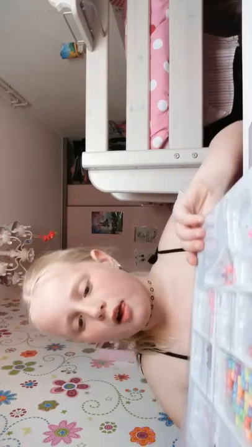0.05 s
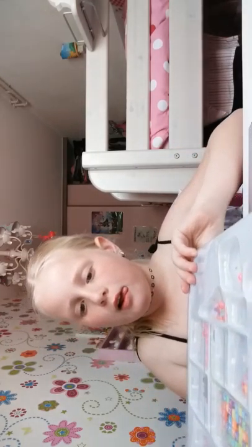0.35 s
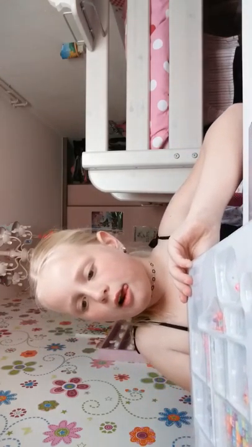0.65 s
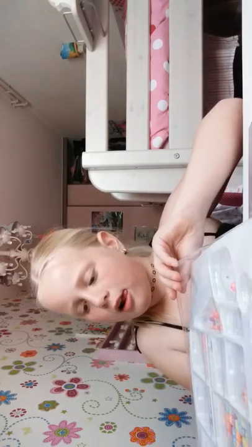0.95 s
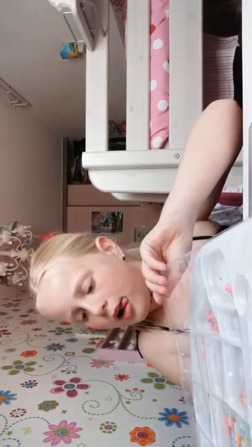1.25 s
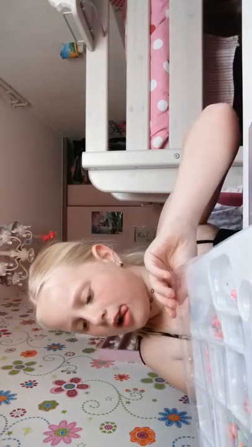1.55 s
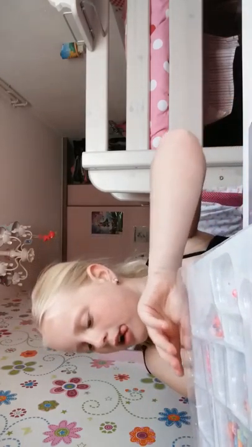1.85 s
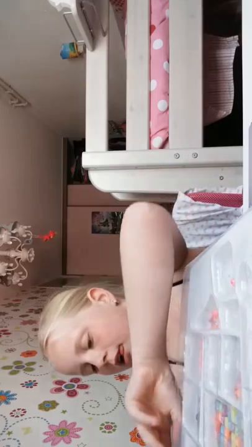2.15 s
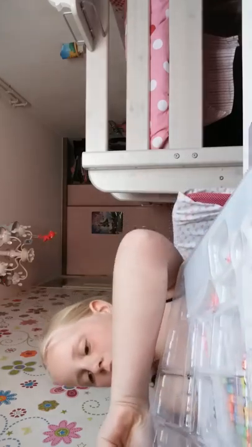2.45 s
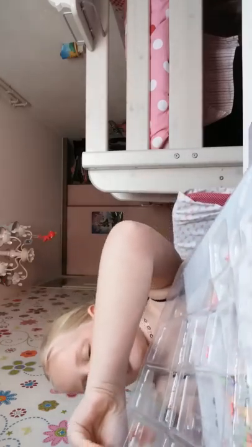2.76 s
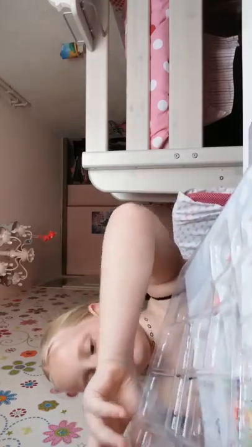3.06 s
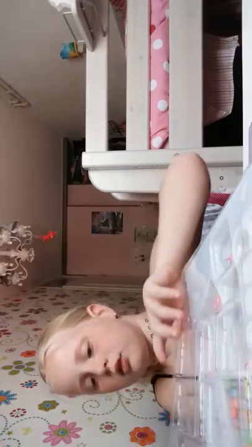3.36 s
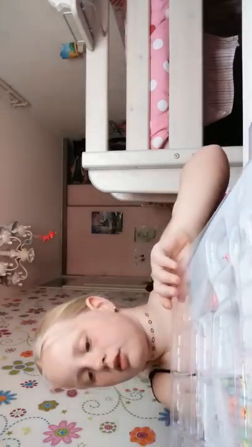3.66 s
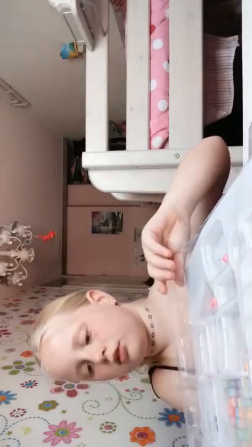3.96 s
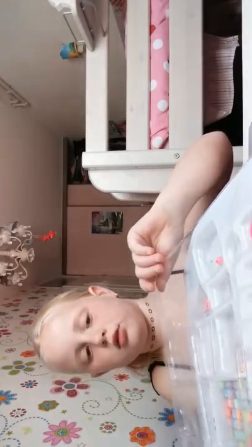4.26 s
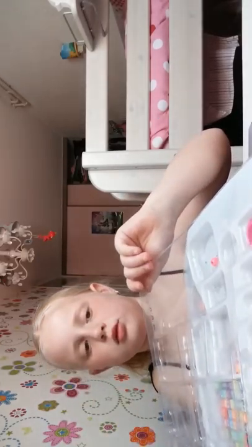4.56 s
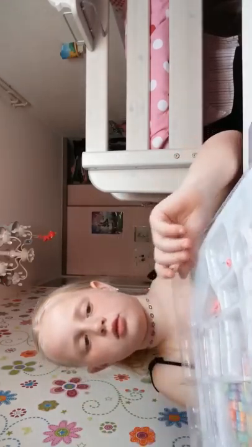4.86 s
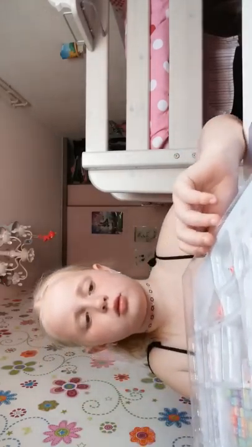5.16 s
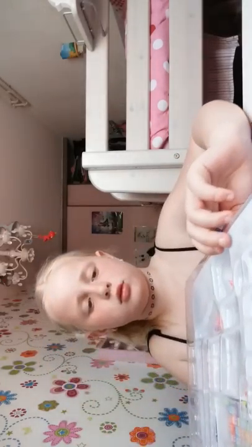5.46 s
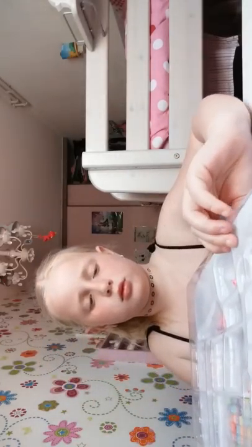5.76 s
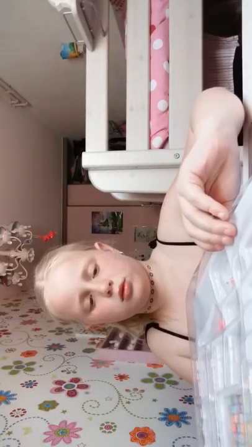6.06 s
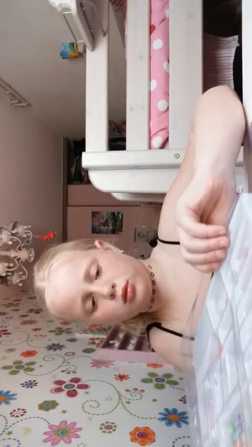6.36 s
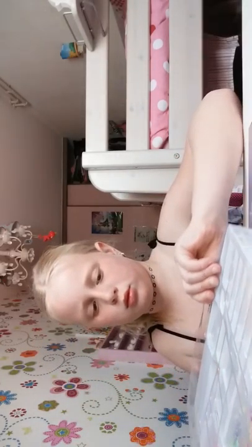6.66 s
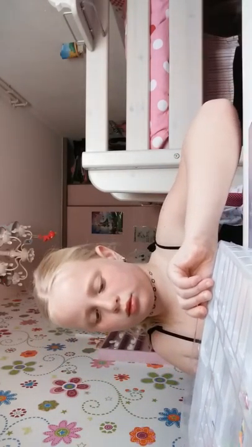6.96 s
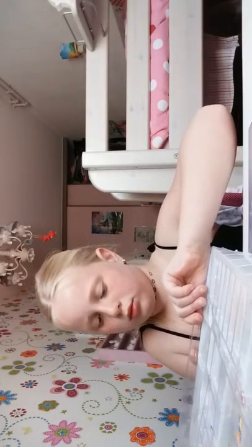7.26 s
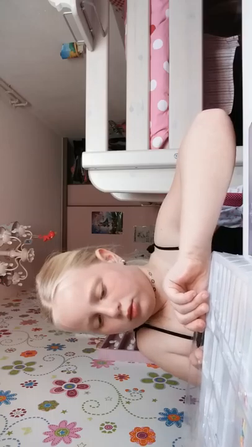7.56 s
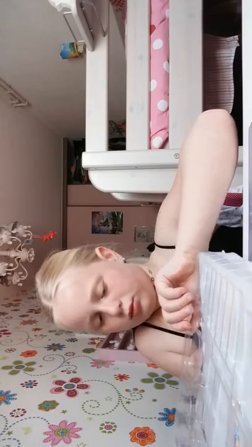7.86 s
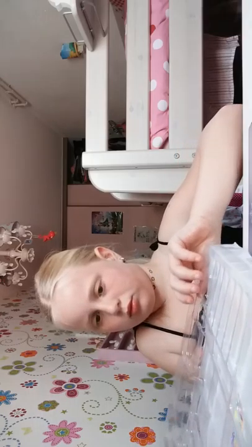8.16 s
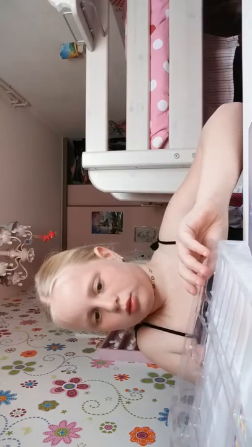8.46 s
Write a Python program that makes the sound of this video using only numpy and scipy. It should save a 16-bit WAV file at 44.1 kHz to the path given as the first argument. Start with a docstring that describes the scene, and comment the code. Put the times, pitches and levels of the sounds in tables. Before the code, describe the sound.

Close by in a small furnished room, a thin plastic box scrapes across a desk in uneven bursts while beads patter inside. Its latch snaps three times early on, among dull bumps. Fingers and lid then tap and knock more softly, before firmer sliding and brushing return with another sharp snap, a quick clatter with a thud, and a final shove.

```python
"""A clear plastic bead box is lifted, turned and tilted on a bedroom desk, close to the microphone.
First come short shoves: box and beads scrape, ringing the thin walls, skin brushes the plastic,
the latch cracks three times and the desk carries low thumps. From 2.7 s the handling is lighter,
with finger taps and knocks of lid and dividers. From 4.9 s the slides are harder; the latch cracks
again at 6.3 s, the box clatters and thumps near 7.4 s, and a last push ends at about 8.4 s."""
import sys
import numpy as np
from scipy import signal
from scipy.fft import rfft, irfft, next_fast_len
from scipy.io import wavfile
from scipy.ndimage import uniform_filter1d

SR = 44100
rng = np.random.default_rng(int(sys.argv[2]) if len(sys.argv) > 2 else 0)


def output_pcm(signal):
    """Save a mono or channel-first signal as 16-bit PCM at the path in sys.argv[1].

    Samples are clipped to [-1, 1] before scaling.
    """
    pcm = np.clip(np.atleast_2d(signal).T, -1, 1) * 32767
    wavfile.write(sys.argv[1], SR, np.round(pcm).astype(np.int16))


N = 375732
TIME_S = np.arange(N) / SR
HZ = np.fft.rfftfreq(4096, 1 / SR)


def amp(db):
    """dB to gain."""
    return 10 ** (np.asarray(db) / 20)


def unit(x):
    """Scale to unit rms."""
    return x / np.sqrt(np.mean(x ** 2) + 1e-20)


def over_freq(points, hz=HZ):
    """Interpolate a table over log frequency."""
    f, value = np.transpose(points)
    return np.interp(np.log(hz + 1), np.log(f), value)


def over_time(points, t=TIME_S):
    """Interpolate a table over time."""
    return np.interp(t, *np.transpose(points))


def bell(hz, width_oct):
    """Unit-height bell over log frequency."""
    return np.exp(-(np.log2((HZ + 1) / hz) / width_oct) ** 2)


def resonances_db(modes):
    """Sum of resonant peaks and dips over frequency."""
    return sum(db / (1 + (2 * (HZ - hz) / width_hz) ** 2) for hz, width_hz, db in modes)


def add(mix, s, sound):
    """Mix a stereo sound in at time s."""
    part = mix[:, max(round(s * SR), 0):][:, :sound.shape[1]]
    part += sound[:, :part.shape[1]]


def pan(lean_db):
    """Channel gains for a left-minus-right level."""
    return amp(np.vstack([lean_db, -lean_db]) / 2)


def colour(x, gain_db):
    """Minimum-phase filter: rings after a blow, never before."""
    log_gain = np.log(amp(np.r_[gain_db, gain_db[-2:0:-1]]))
    impulse = np.fft.ifft(np.exp(np.conj(signal.hilbert(log_gain)))).real
    return signal.oaconvolve(x, impulse[None, :len(HZ)], axes=1)


def flatten(burst, width_hz=650):
    """Level the broad spectrum; narrow peaks and dips stay."""
    power = uniform_filter1d(abs(rfft(burst[:2 * len(HZ) - 2])) ** 2, int(width_hz / HZ[1]))
    return colour(burst[None], -10 * np.log10(abs(power) + 1e-9))[0, :len(burst)]


def wobble(per_s):
    """Smooth random motion of about unit size."""
    steps = rng.standard_normal(N // 20)
    return np.interp(TIME_S * per_s, np.arange(len(steps)), steps)


def grains(per_s, spread_db):
    """Tiny impacts, random in time and size."""
    size = amp(spread_db * np.minimum(rng.exponential(1, N), 4))
    return unit(rng.standard_normal((2, N)) * size * (rng.random(N) < per_s / SR))


# left-right likeness: f/Hz, correlation
CORRELATION = [(60, 0.95), (600, 0.85), (1200, 0.59), (2200, 0.25), (4000, 0.033), (15000, 0.029)]
def mic_pair(x):
    """Two unrelated signals to stereo: alike in the bass, apart in the treble."""
    size = next_fast_len(x.shape[1])
    mid, side = rfft(x, size)
    same = over_freq(CORRELATION, np.fft.rfftfreq(size, 1 / SR))
    mid, side = mid * np.sqrt(1 + same), side * np.sqrt(1 - same)
    return irfft(np.array([mid + side, mid - side]), size)[:, :x.shape[1]]


def texture(drive, gain_db):
    """Coloured stereo layer at unit rms."""
    return unit(mic_pair(colour(drive, gain_db))[:, :N])


# room noise: f/Hz, level/dB
AMBIENCE_SPECTRUM = [(20, 4), (110, 13), (300, 7), (600, 16), (1100, -33.5), (2000, -44), (5000, -48.5),
                     (15000, -24)]
def ambience(level_db=-67):
    """Faint steady room noise."""
    return amp(level_db) * texture(rng.standard_normal((2, N)), over_freq(AMBIENCE_SPECTRUM))


# reverberation: f/Hz, t60/s
ROOM_DECAY = [(100, 0.48), (600, 0.18), (2500, 0.2), (6000, 0.2), (15000, 0.21)]
def room(x, build_s=0.0049):
    """Small furnished room: dense reflections, bass lasting longest."""
    hz, t, noise = signal.stft(rng.standard_normal((2, SR // 2)), SR, nperseg=256)
    decay = amp(-60 * t / over_freq(ROOM_DECAY, hz)[:, None])
    tail = mic_pair(signal.istft(noise * decay, SR, nperseg=256)[1])
    tail *= 1 - np.exp(-(np.arange(tail.shape[1]) / SR / build_s) ** 2)
    return signal.fftconvolve(x, tail / np.linalg.norm(tail[0]), axes=1)[:, :N]


# firmness of the shifting hands: t/s, level/dB
GRIP_DB = [(0, 15), (0.43, 3), (0.54, -5.5), (0.62, 1.5), (0.88, -8), (1.1, -0.5), (1.24, -22), (1.36, -23),
           (1.55, 5), (1.92, 5), (2.35, -4), (2.69, -2), (2.77, 1.5), (2.93, -3), (3.25, 2.5), (3.48, -7),
           (3.7, -2), (3.9, -6.5), (4.2, 1), (4.35, -19), (4.47, -1), (4.72, 9), (4.86, 3.5), (5.3, 7),
           (5.5, -2.5), (5.68, 5), (6.86, 5), (7.0, 8.5), (7.13, 6.5), (7.4, -1.5), (7.8, 9), (8.52, 4)]
# shoves of the box: t/s, rise/s, hold/s, scrape level/dB, brush level/dB, bump level/dB
SHOVES = [(-0.04, 0.11, 0.065, -35, -41, -74.5), (0.215, 0.055, 0.046, -42.5, -43, -47),
          (0.655, .01, 0.17, -57, -78, -61.5), (0.901, 0.0073, 0.016, -28, -35, -43),
          (0.94, 0.0084, 0.042, -36.5, -41.5, -48), (1.261, 0.058, 0.056, -48, -56.5, -53.5),
          (1.382, 0.054, 0.18, -74, -59.5, -66), (1.62, 0.034, 0.26, -53.5, -53.5, -78),
          (1.962, 0.057, 0.12, -33, -43.5, -47.5), (2.124, 0.024, 0.095, -38, -46, -48.5),
          (2.42, 0.096, 0.041, -40.5, -44.5, -50), (2.75, 0.16, 0.2, -68, -54.5, -75),
          (3.018, 0.029, 0.15, -47.5, -71, -59), (3.268, 0.041, 0.068, -58, -59.5, -55),
          (3.608, 0.037, 0.1, -52, -58.5, -54), (4.052, 0.003, 0.037, -49, -48, -68),
          (4.367, 0.087, 0.11, -48, -63, -57), (4.9, 0.094, 0.13, -31.5, -51.5, -48),
          (5.132, 0.016, 0.11, -44.5, -65, -59), (5.539, 0.037, 0.23, -43, -57, -51.5),
          (5.914, 0.16, 0.13, -32, -43.5, -50), (6.219, 0.022, 0.095, -37, -47, -50),
          (6.356, 0.045, 0.039, -33, -38.5, -62), (6.452, 0.024, 0.13, -36, -45, -64),
          (6.625, 0.024, 0.082, -35, -47, -42.5), (6.914, 0.016, 0.09, -57, -63, -47.5),
          (7.17, 0.031, 0.03, -50.5, -51.5, -46.5), (7.429, 0.0062, 0.054, -30.5, -34.5, -42.5),
          (7.555, 0.04, 0.032, -38, -42, -45.5), (7.618, 0.03, 0.039, -35.5, -44, -54),
          (7.965, 0.081, 0.036, -36, -45, -45), (8.197, 0.1, 0.078, -38.5, -45, -44)]
def effort(layer, grip_db, start_db=-15.5, release_db_per_s=196):
    """Gain of a rubbing layer: shifting grip plus shoves that speed up, hold and die."""
    column = ("scrape", "brush", "bump").index(layer)
    t = np.arange(0, N / SR, 0.001)
    power = amp(grip_db + over_time(GRIP_DB, t)) ** 2
    for s, rise_s, hold_s, *levels_db in SHOVES:
        rise_db = start_db * np.maximum(1 - (t - s) / rise_s, 0)
        fall_db = release_db_per_s * np.maximum(t - s - rise_s - hold_s, 0)
        power += amp(levels_db[column] + rise_db - fall_db) ** 2
    return np.interp(TIME_S, t, np.sqrt(power))


# desk rumble: f/Hz, level/dB
BUMP_SPECTRUM = [(28, -42), (50, -14), (75, -5), (110, 0), (152, 2), (200, -2.5), (250, 1), (310, -2),
                 (400, -6), (900, -16), (5000, -38.5), (14000, -51)]
def bumping(trim_db=-3.5, uneven_db=-2.1):
    """Soft pushes of box and arms, carried through the desk."""
    pushes = grains(per_s=390, spread_db=-9) * amp(uneven_db * wobble(per_s=30))
    rumble = texture(pushes, over_freq(BUMP_SPECTRUM))
    return rumble * effort("bump", grip_db=-63) * amp(trim_db) * pan(lean_db=0.5)


# box set down or pushed on the desk: t/s, level/dB, f/Hz, swell/s
DESK_THUMPS = [(0.908, -31.5, 94, 0.0054), (2.014, -38.5, 116, 0.0066), (2.106, -39, 126, 0.0055),
               (2.203, -38, 156, 0.0038), (2.488, -40.5, 115, 0.0044), (7.428, -32.5, 153, 0.01),
               (8.269, -41, 150.3, 0.033), (8.345, -40.5, 190, 0.024)]
def thumps():
    """The desk top swings briefly under each push."""
    out, t = np.zeros((2, N)), np.arange(SR // 5) / SR
    for s, db, hz, swell_s in DESK_THUMPS:
        swing = (t / swell_s * np.exp(1 - t / swell_s)) ** 2 * np.cos(2 * np.pi * hz * t)
        speed = np.gradient(swing) * SR / (2 * np.pi * hz)
        add(out, s, amp(db) * speed * pan(lean_db=-1))
    return out


# skin on plastic: f/Hz, level/dB
BRUSH_SPECTRUM = [(300, -8.5), (1500, -26), (2700, -2.5), (4000, 4), (5700, 0), (8500, -1), (12500, -6),
                  (15500, -18)]
def brushing(catch_db=-8, trim_db=1.07, uneven_db=2):
    """Skin drags over plastic: fine bright hiss that catches now and then."""
    fizz = grains(per_s=13000, spread_db=-0.5) * amp(uneven_db * wobble(per_s=99))
    catches = amp(catch_db) * grains(per_s=160, spread_db=3.5)
    hiss = texture(fizz + catches, over_freq(BRUSH_SPECTRUM))
    return hiss * effort("brush", grip_db=-62) * amp(trim_db) * pan(lean_db=-1.4)


# wall and compartment modes, dips between: f/Hz, width/Hz, level/dB at depth 1
BODY_MODES = [(364, 44, -5), (568.3, 13.5, 2), (681, 62, 6), (770, 98, 5.5), (936, 110, 1.5),
              (1031, 310, 4.5), (1212, 50, -4), (1373, 385, 4.5), (2034, 59, -2), (3690, 1560, 3.5)]
def body_db(depth):
    """Response of the thin-walled box, rubbed or struck."""
    return depth * resonances_db(BODY_MODES)


# air modes, dips between: f/Hz, width/Hz, level/dB at depth 1
AIR_MODES = [(538, 150, 3.5), (773, 180, -1), (994, 130, 6), (1215, 110, -3.5), (1513, 300, 5),
             (1880, 160, -2), (2960, 400, -2)]
def cavity_db(depth):
    """Response of the air in the compartments."""
    return depth * resonances_db(AIR_MODES)


# freedom of the compartments to ring: t/s, share/0-1
HOLLOW_SHARE = [(0.9, 0.1), (1.75, 1), (2.1, 0.14), (4.9, 1), (5.7, 1), (6.4, 0), (6.9, 0.4), (7.5, .15)]
def compartments(rub):
    """Compartments ring under light handling; hard shoves damp them."""
    share = over_time(HOLLOW_SHARE)
    hollow = unit(colour(rub, cavity_db(depth=1.04))[:, :N])
    return (1 - share) * rub + share * hollow


# note of the rubbed wall: t/s, f/Hz, level/dB
WALL_RESONANCE = [(.1, 1580, 3), (1.0, 1770, 1), (2.2, 1650, 2.5), (3.1, 1860, 4.5), (4.8, 1500, -1.5),
                  (5.1, 1510, 1.5), (5.8, 1480, 2), (6.2, 1760, 4.5), (6.45, 1440, 4.5), (7.7, 2010, 4),
                  (8.4, 1760, 0)]
def flexing_wall(rub, width_hz=260):
    """One resonance shifts as the box is turned and flexed."""
    s, hz, db = np.transpose(WALL_RESONANCE)
    carrier = np.exp(2j * np.pi * np.cumsum(np.interp(TIME_S, s, hz)) / SR)
    pole = np.exp(-np.pi * width_hz / SR)
    note = 2 * (carrier * signal.lfilter([1 - pole], [1, -pole], rub / carrier)).real
    return rub + note * (amp(np.interp(TIME_S, s, db)) - 1)


# rasp boost: t/s, level/dB
RASP_DB = [(0, 3.5), (.95, 10), (1.75, 8.5), (2.1, 6.5), (5, 5), (6.15, 9.5), (6.45, 13.5), (6.8, 4),
           (7.5, 10), (8.1, 8)]
def lid_rasp(rub, hz=2900, width_oct=1):
    """The dragging lid edge lifts one treble band."""
    bandpass = np.fft.fftshift(irfft(bell(hz, width_oct)))[1:]
    edge = signal.oaconvolve(rub, bandpass[None], "same", axes=1)
    return rub + edge * (amp(over_time(RASP_DB)) - 1)


def beads(per_s=140, chatter_s=0.002):
    """Single beads tip over, each chattering briefly against a wall."""
    tips = rng.uniform(0.6, 1, N) * (rng.random(N) < per_s / SR)
    power = signal.lfilter([1], [1, -np.exp(-2 / (chatter_s * SR))], tips ** 2 + 1e-12)
    return unit(np.sqrt(power) * rng.standard_normal((2, N)))


# sliding plastic: f/Hz, level/dB
SCRAPE_SPECTRUM = [(40, -39), (200, -10), (360, -0.5), (520, 4), (800, 0.5), (1100, -0.5), (1500, -4),
                   (2000, -6), (2700, -7), (4000, -17), (7000, -16.5), (15000, -46.5)]
def scraping(trim_db=-1.28, uneven_db=2, beads_db=-5):
    """Slipping plastic and sliding beads: a dense patter rings the box."""
    slips = grains(per_s=7000, spread_db=1.5) * amp(uneven_db * wobble(per_s=88))
    patter = slips + amp(beads_db) * beads()
    rub = texture(patter, over_freq(SCRAPE_SPECTRUM) + body_db(depth=1.29))
    rub = flexing_wall(compartments(lid_rasp(rub)))
    return rub * effort("scrape", grip_db=-55.5) * amp(trim_db)


# lid and wall panels: f/Hz, energy level/dB re blow, t60/s
PANEL_MODES = [(550, -27.5, 0.042), (764, -29, .08), (1021, -22.5, 0.032), (1444, -29.5, 0.042),
               (1695, -28.5, 0.033), (2365, -25, 0.015), (3840, -26, 0.049), (4380, -26.5, 0.062)]
def panels(t):
    """Panels ring freely after a blow."""
    ring = np.zeros((2, len(t)))
    for hz, db, t60 in PANEL_MODES:
        unit_energy = np.sqrt(4 * np.log(1000) / (t60 * SR))
        ring += unit_energy * amp(db - 60 * t / t60) * np.sin(2 * np.pi * (hz * t + rng.random((2, 1))))
    return ring


# struck plastic: f/Hz, level/dB
STRIKE_SPECTRUM = [(30, -25), (90, -9), (350, -14.5), (550, -1), (750, -6), (1100, -6), (1600, -3.5),
                   (2500, -2), (4000, -9), (8000, -14.5), (13000, -28.5), (16000, -50)]
def blow(ring_hz, ring_db, hollow_db, tilt_db_per_oct, t60_s, cavity_depth, ring_oct,
         crack=0.65, crack_s=0.00047, node_db=5, node_ratio=1.443, span_s=0.013, trim_db=-0.74):
    """A sharp crack, then bending waves die in the walls; each spot has its own ring."""
    t = np.arange(SR // 10) / SR
    envelope = amp(-60 * t / t60_s) + crack * np.exp(-t / crack_s)
    bursts = rng.standard_normal((2, len(t))) * envelope
    drive = np.array([flatten(burst) for burst in bursts]) + panels(t)
    # stiff corners ring high; mid-wall also sounds the hollow of the box
    spot_db = ring_db * bell(ring_hz, ring_oct) + hollow_db * bell(hz=750, width_oct=0.5)
    # the spot moves little on either side of its ring
    for node_hz in (ring_hz / node_ratio, ring_hz * node_ratio):
        spot_db -= node_db * bell(node_hz, ring_oct / 2)
    hardness_db = tilt_db_per_oct * np.log2(np.maximum(HZ, 400) / 1500)
    box_db = over_freq(STRIKE_SPECTRUM) + body_db(depth=1.03) + cavity_db(cavity_depth)
    hit = mic_pair(colour(drive, box_db + spot_db + hardness_db))
    hit *= np.sqrt(span_s * SR) / np.linalg.norm(hit, axis=1, keepdims=True)  # energy of unit rms over span_s
    return amp(trim_db) * hit


# edge ticks: t/s, level/dB, tilt/(dB/oct)
EDGE_TICKS = [(0.274, -40.5, -2), (0.3278, -35, 7), (0.596, -49, 6), (1.395, -47.5, 4), (2.369, -45.5, 3),
              (2.478, -37.5, 7.5), (3.3257, -47.5, 11.5), (3.6328, -52.5, 8), (4.178, -46, 2.5),
              (4.4214, -43, 0.5), (4.518, -43.5, 6), (5.4454, -43, -1), (5.545, -46, 9), (5.744, -43, 5.5),
              (6.583, -29.5, 1.5), (7.014, -36, 1.5)]
def ticks():
    """A plastic edge catches: one thin high ring."""
    out = np.zeros((2, N))
    for s, db, tilt in EDGE_TICKS:
        add(out, s, amp(db) * blow(ring_hz=5230, ring_db=3.5, hollow_db=-1.5, tilt_db_per_oct=tilt,
                                   t60_s=0.054, cavity_depth=0, ring_oct=0.97))
    return out


# soft taps: t/s, level/dB, ring f/Hz, tilt/(dB/oct), t60/s
SOFT_TAPS = [(1.141, -45.5, 1190, -6, 0.031), (1.415, -48.5, 870, -6, 0.05),
             (1.666, -38.5, 1150, -2, 0.045), (1.771, -46, 1010, -3, 0.023),
             (1.787, -42, 1390, -2.5, 0.017), (2.7364, -42, 943, -0.5, 0.12),
             (2.874, -41.5, 1080, -2.5, 0.032), (3.0784, -33, 920, -1.5, 0.073),
             (3.1796, -45, 1580, -2, .027), (3.215, -45, 1490, -1, .023), (3.5147, -42, 1200, -7.5, 0.042),
             (3.771, -42.5, 1000, -4.5, 0.05), (3.804, -39.5, 1050, -4.5, 0.033),
             (4.2085, -37.5, 1640, -3.5, 0.018), (4.387, -47, 1210, -4, .03),
             (4.4533, -38.5, 1570, -2.5, 0.014), (4.4805, -38, 1040, -1, 0.032),
             (4.659, -26.5, 1020, -5, .084), (4.6791, -32, 1070, -4, 0.13), (4.7966, -43, 1000, 2.5, .026),
             (4.917, -38.5, 1050, -3.5, 0.027), (5.006, -31, 1570, -2, 0.086),
             (5.065, -33, 1490, -3.5, .04), (5.1928, -34.5, 1640, -4, 0.032),
             (5.8507, -34, 1330, -2, 0.016), (5.945, -40.5, 1440, 4.5, 0.02), (6.18, -28, 960, -2.5, 0.039),
             (6.5017, -33, 1040, -1, 0.032), (6.739, -33.5, 1550, -3.5, 0.028), (6.9, -38, 1200, -4, .018),
             (6.932, -41.5, 1210, -2.5, 0.026), (6.975, -38, 1100, 1, .04), (7.1315, -44.5, 1150, -2, .03),
             (7.19, -40, 1110, -3, 0.12), (7.7906, -39.5, 1590, -3, .028)]
def taps():
    """Fingers and lid tap the box: a short hollow "tok"."""
    out = np.zeros((2, N))
    for s, db, hz, tilt, t60 in SOFT_TAPS:
        add(out, s, amp(db) * blow(ring_hz=hz, ring_db=8, hollow_db=-2.5, tilt_db_per_oct=tilt,
                                   t60_s=t60, cavity_depth=0.83, ring_oct=0.44))
    return out


# snaps and knocks: t/s, level/dB, ring f/Hz, ring/dB, hollow/dB, tilt/(dB/oct), t60/s, cavity depth
BOX_SNAPS = [(0.4037, -31.5, 2870, 9, 11, 2.5, 0.02, 0), (0.6518, -34.5, 3300, 14.5, -9, 1.5, 0.037, 0.53),
             (0.7564, -24.5, 3780, 14.5, -6, 2.5, 0.031, 0.94),
             (0.8544, -39, 1930, 12, 7, 1.5, 0.037, 0.17), (0.9087, -22.5, 4500, 12, 11, -1.5, 0.12, 0),
             (1.0216, -29, 2600, 8, 15, 2, 0.054, 0.47), (1.5739, -21.5, 2680, 10, 9.5, 2.5, 0.026, 0.53),
             (1.8737, -35, 1330, 9.5, 0, 1, 0.046, 0.22), (2.028, -22.5, 2000, 8.5, 9, 3.5, 0.73, 0),
             (2.2121, -29.5, 2060, 10, -7, -0.5, 0.16, 0.45), (2.5235, -32.5, 2110, 20, -12, 8.5, 0.09, 0),
             (4.0561, -21.5, 3900, 5.5, 15.5, 4, 0.036, 1.3), (4.137, -32.5, 1900, 3, -2, -0.1, 0.067, 0.8),
             (4.2682, -30.5, 1880, 10, -6, -1.5, 0.013, 0.62),
             (4.6565, -21, 1800, 10, -2.5, -0.5, 0.029, 1.3),
             (6.3329, -22.5, 2720, 22, -14, 0, 0.012, 0.16), (6.651, -23, 4640, 10, -10, 1.5, 0.025, 0),
             (6.952, -29.5, 1190, 12, 3.5, 0, 0.092, 0.2), (7.2702, -31, 5200, 11, -4, 3, 0.03, 0.0093),
             (7.2895, -37.5, 2300, 0, -2, 2.5, .04, 0.43), (7.3088, -34.5, 3570, 5.5, 5, 3, 0.027, 0.12),
             (7.3503, -28, 5600, 9.5, 0.5, 3, 0.028, 0.22), (7.4237, -28.5, 1050, 5, 13, 5.5, .03, 0.36),
             (7.4374, -19.5, 960, 17, -3, -3.5, 0.02, 0.36), (7.4435, -26, 950, 14, -2, 3.5, 0.0078, 0.65),
             (7.4503, -27, 3240, 8, 3, 2, 0.017, 0.1), (7.589, -32, 1170, 13, -2, 7, 0.035, 0.04),
             (7.6093, -26.5, 2640, 21, 15, -0.5, 0.025, 0.1)]
def snaps():
    """Lid, latch and dividers snap and knock, each in its own colour."""
    out = np.zeros((2, N))
    for s, db, *spot in BOX_SNAPS:
        add(out, s, amp(db) * blow(*spot, ring_oct=0.84))
    return out


# latch cracks: t/s, level/dB, f/Hz, swell/s, left minus right/dB
LATCH_CRACKS = [(0.6517, -25, 3230, 0.00055, 2), (0.7567, -8, 3450, 0.00028, -5),
                (1.5739, -12, 2430, 0.00043, -5), (6.3328, -6.5, 2480, 0.00045, -2)]
def latch(echo_s=0.0023, echo_db=-12, left_lag_s=0.00005):
    """The stiff tongue springs over its catch for a few cycles; a nearby surface echoes it."""
    out, t = np.zeros((2, N)), np.arange(SR // 50) / SR
    t = np.maximum(t - np.vstack([left_lag_s, 0]), 0)
    for s, db, hz, swell_s, lean_db in LATCH_CRACKS:
        envelope = t / swell_s * np.exp(1 - t / swell_s)
        crack = amp(db) * pan(lean_db) * envelope * np.sin(2 * np.pi * hz * t)
        add(out, s, crack)
        add(out, s + echo_s, amp(echo_db) * crack)
    return out


# box position: t/s, left minus right/dB
BOX_LEAN_DB = [(.5, -2), (.76, -3), (2.1, -3), (3.7, -2.5), (4.1, -2), (4.7, -2), (6.3, -2.5), (7.4, -1.5),
               (7.6, -3.5), (8.3, -2)]
def scene(hit_room_db=-8, rub_room_db=-10, latch_room_db=-14):
    """The box close by, the room behind it."""
    place = pan(over_time(BOX_LEAN_DB))
    hits = (snaps() + taps() + ticks()) * place + thumps()
    rubs = scraping() * place + brushing() + bumping()
    cracks = latch()
    reverb = room(amp(hit_room_db) * hits + amp(rub_room_db) * rubs + amp(latch_room_db) * cracks)
    return hits + rubs + cracks + reverb + ambience()


def record(dry, cutoff_hz=15700):
    """Steep low-pass band limit."""
    lowpass = signal.firwin(255, cutoff_hz, window=("kaiser", 9), fs=SR)
    return signal.oaconvolve(dry, lowpass[None], "same")


dry = scene()
out = record(dry)
output_pcm(out)
```